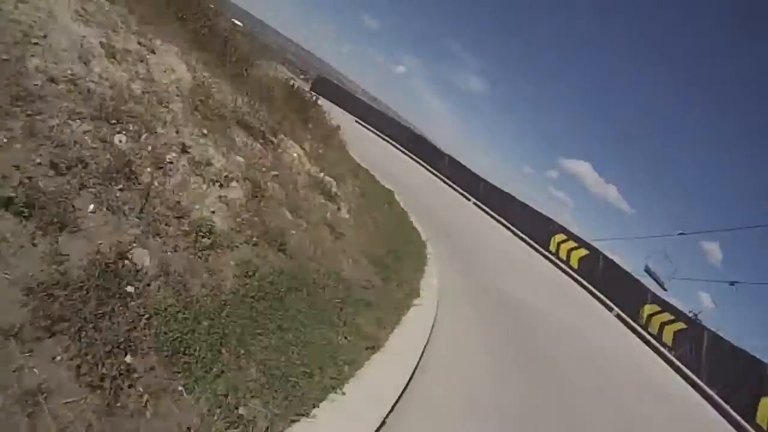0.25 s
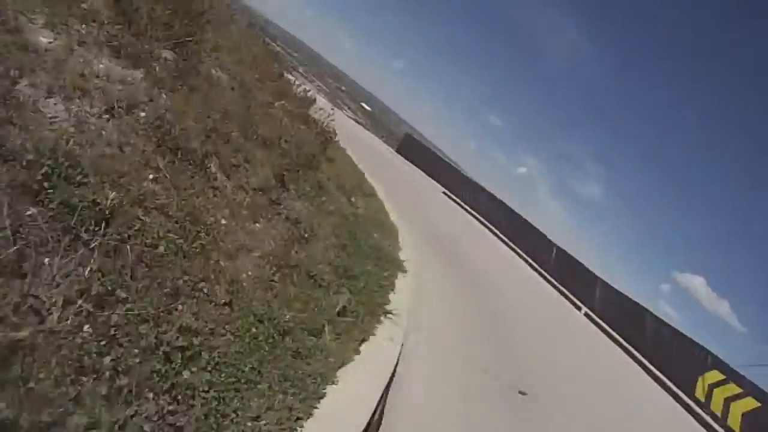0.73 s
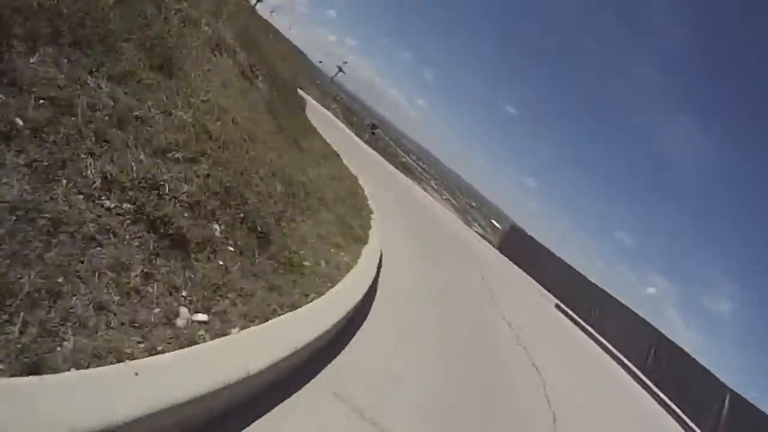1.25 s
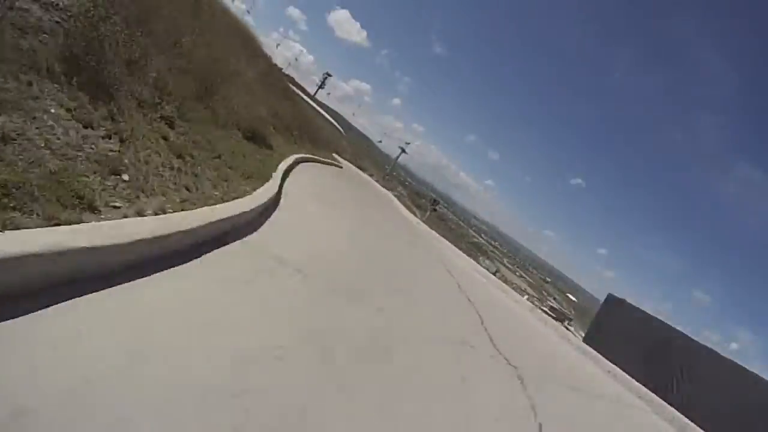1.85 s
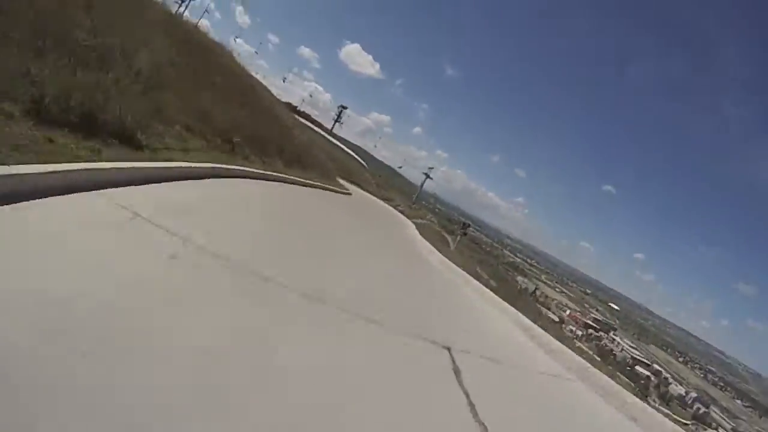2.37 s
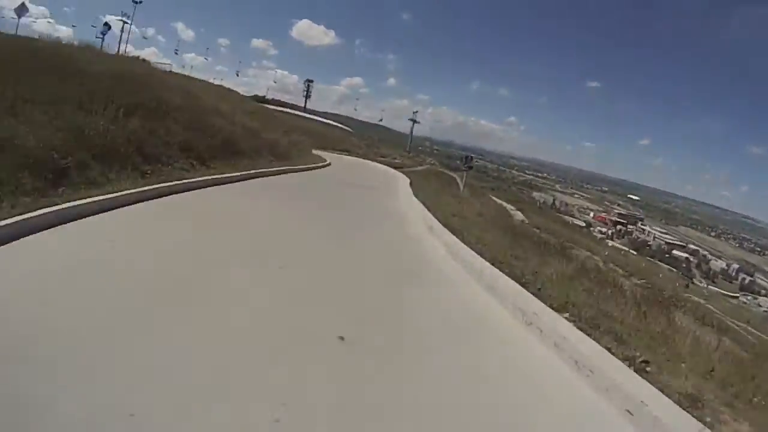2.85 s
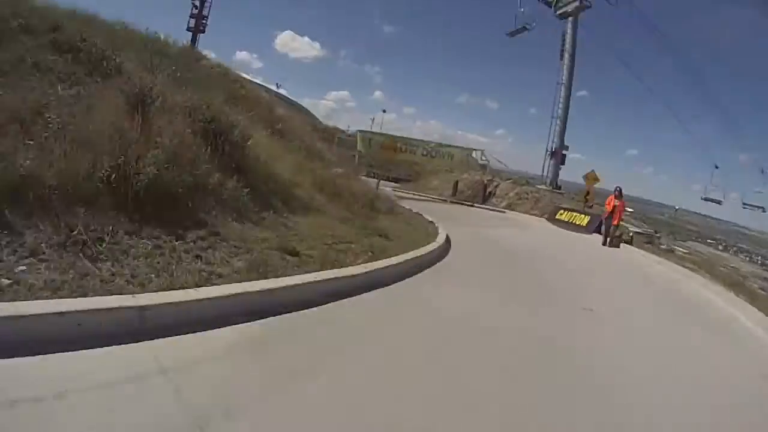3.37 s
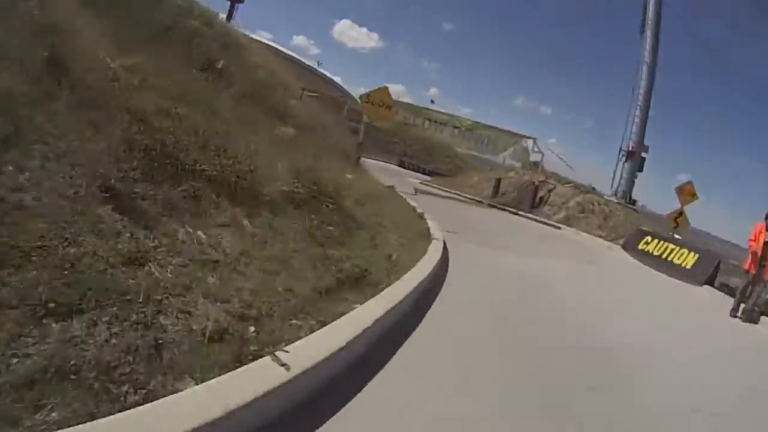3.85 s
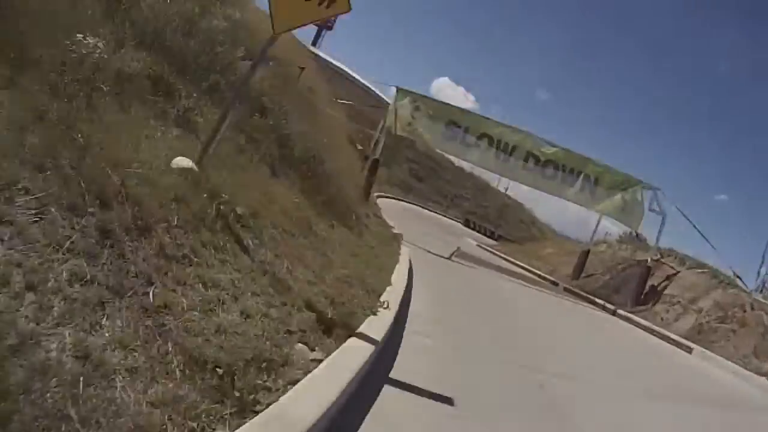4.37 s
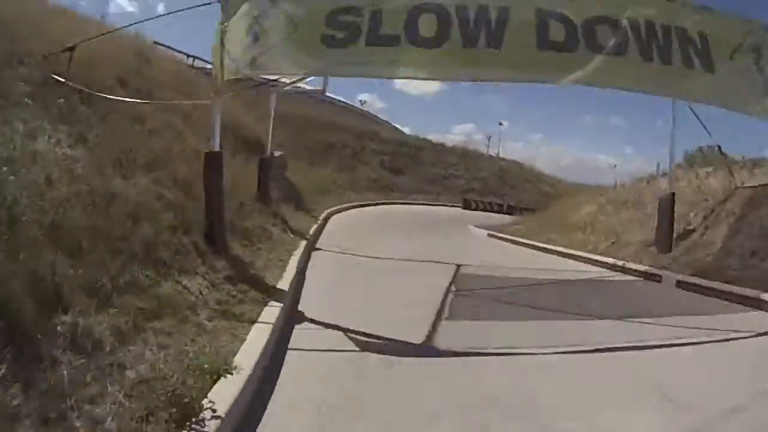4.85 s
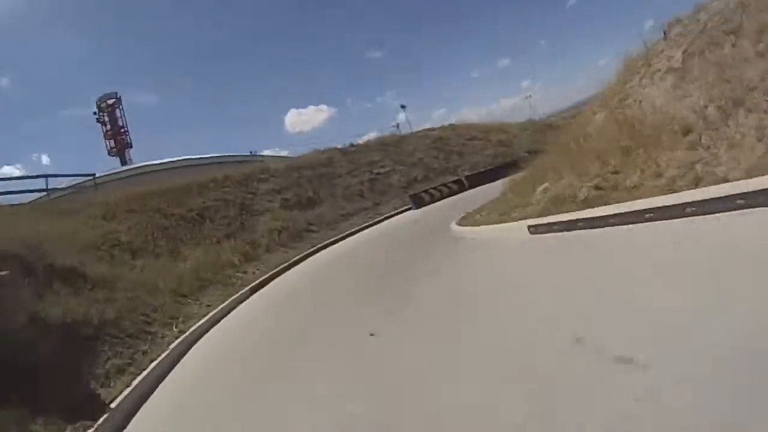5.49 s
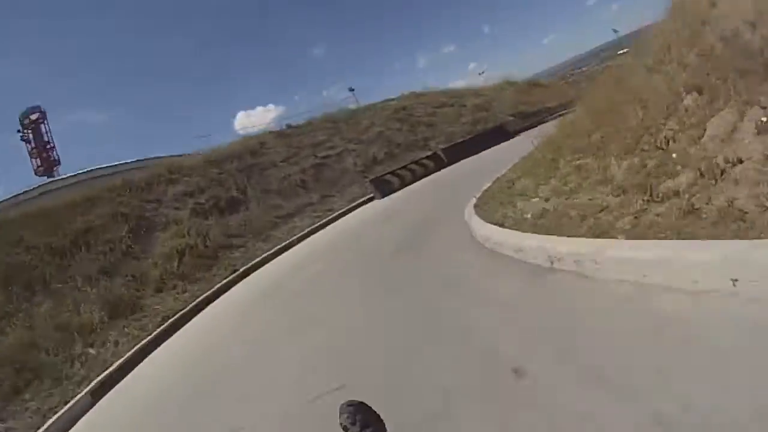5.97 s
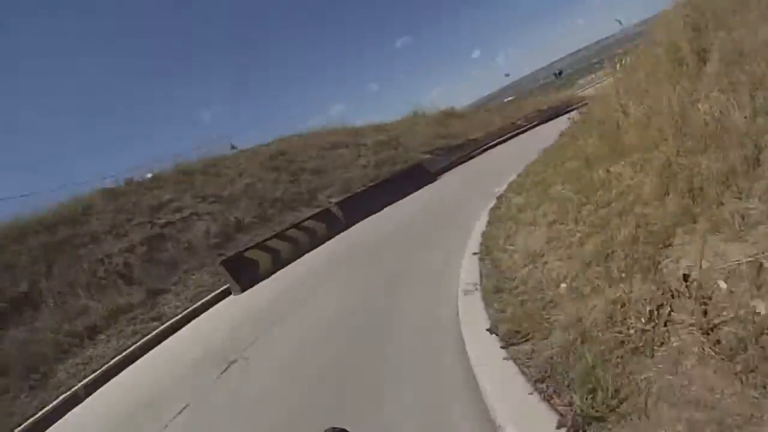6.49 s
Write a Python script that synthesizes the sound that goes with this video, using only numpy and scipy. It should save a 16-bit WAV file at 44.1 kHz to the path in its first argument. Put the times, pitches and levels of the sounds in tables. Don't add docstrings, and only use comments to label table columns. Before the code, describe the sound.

Heard from inside a closed case on board, hard wheels rumble and knock over rough concrete, with wind thumps and late hissing tyre slides.

```python
import sys
import numpy as np
from scipy import signal
from scipy.fft import rfft, irfft, next_fast_len
from scipy.io import wavfile
from scipy.ndimage import uniform_filter1d, minimum_filter1d, map_coordinates

SR = 44100
rng = np.random.default_rng(int(sys.argv[2]) if len(sys.argv) > 2 else 0)


def generate_wav(signal):
    frames = np.transpose(np.atleast_2d(signal))
    scaled = np.clip(frames, -1, 1) * 32767
    pcm = np.round(scaled).astype(np.int16)
    wavfile.write(sys.argv[1], SR, pcm)


def boost(x):
    u = np.asarray(x, float) / 20
    return 10 ** u


N = 296784

# start in seconds, peak in dB, pitch of the wheel's ring in Hz.
CRACKS = [(0.023, -6, 696), (0.043, -13.5, 610), (0.115, -9, 610), (0.209, -6, 688), (0.332, -7, 760),
          (0.428, -5, 640), (0.501, -6.5, 696), (0.547, -7, 633), (0.637, -2.5, 768), (0.832, -4, 702),
          (1.046, -10.5, 600), (1.162, -6.5, 608), (1.252, -3.5, 664), (1.315, -3.5, 612),
          (1.348, -6.5, 578), (1.506, -9, 665), (1.646, -8.5, 694), (1.736, -10.5, 740), (1.82, -8.5, 636),
          (1.85, -5.5, 690), (1.919, -8, 774), (2.032, -9, 718), (2.053, -11, 670), (2.25, -9.5, 656),
          (2.385, -12, 638), (2.562, -8.5, 791), (2.684, -9, 685), (2.949, -6.5, 567), (3.019, -7.5, 710),
          (3.138, -9, 493), (3.366, -5.5, 549), (3.463, -8.5, 700), (3.525, -4.5, 764), (3.668, -1, 580),
          (3.732, -6, 622), (3.922, -7.5, 648), (4.04, -11.5, 618), (4.21, -7.5, 595), (4.235, -9.5, 586),
          (4.265, -8, 460), (4.332, -7, 680), (4.473, -9, 515), (4.553, -3, 641), (4.724, -8, 583),
          (4.824, -14.5, 706), (4.969, -3.5, 638), (5.155, -11.5, 737), (5.34, -9.5, 697),
          (5.679, -8.5, 644), (5.81, -9.5, 634), (5.862, -6, 680), (5.93, -7.5, 733), (5.963, -12.5, 650),
          (6.199, -9.5, 738), (6.693, -4.5, 700)]
# start in seconds, peak in dB, pitch in Hz.
PART_KNOCKS = [(0.0212, -38, 5800), (0.0388, -36.5, 5790), (0.0726, -33, 5800), (0.1382, -30, 4400),
               (0.208, -36, 4690), (0.319, -37.5, 4380), (0.3402, -33.5, 5520), (0.377, -36, 4690),
               (0.529, -44, 4390), (0.6, -34, 5700), (0.7358, -41, 4160), (0.7552, -33.5, 6160),
               (0.793, -40, 5010), (0.95, -38, 4510), (1.016, -39, 4170), (1.066, -33, 5810),
               (1.1917, -41.5, 4420), (1.254, -38, 4930), (1.2985, -42, 4390), (1.3156, -37, 4300),
               (1.3473, -39.5, 4450), (1.4346, -35.5, 4400), (1.513, -35.5, 4640), (1.541, -40.5, 4600),
               (1.69, -41, 4340), (1.708, -43, 4600), (1.7636, -41, 4450), (1.8355, -39.5, 4440),
               (1.9005, -39.5, 4430), (1.9584, -41.5, 4740), (2.2277, -43.5, 4420), (2.5456, -43, 6340),
               (3.6343, -42.5, 4920), (3.6673, -36, 4660), (3.6903, -37, 4640), (3.8194, -48.5, 4400),
               (3.916, -37, 4450), (4.087, -39.5, 6050), (4.116, -43, 4340), (4.2771, -35, 5790),
               (4.3174, -42.5, 4160), (4.4014, -37.5, 5290), (4.4733, -34.5, 5850), (4.554, -33.5, 6670),
               (4.5999, -38.5, 4330), (4.6222, -37.5, 4620), (4.675, -43, 4300), (4.8938, -40.5, 4200)]
# start in seconds, peak in dB, pitch in Hz.
GRIT_TAPS = [(0.0366, -29.5, 1790), (0.0911, -28.5, 1810), (0.1386, -34, 1780), (0.185, -35.5, 1700),
             (0.2116, -28, 1980), (0.4806, -35.5, 1700), (0.531, -38, 2050), (0.611, -35, 1960),
             (0.737, -33, 1640), (0.7528, -36, 1960), (0.7705, -36.5, 1810), (0.8996, -34.5, 1780),
             (1.0666, -28, 1750), (1.0984, -34, 1700), (1.2986, -35, 1880), (1.6271, -33.5, 1980),
             (1.727, -37, 1770), (1.8384, -29.5, 1900), (1.8696, -30.5, 2170), (2.0857, -35.5, 2010),
             (2.226, -30, 1700), (2.3396, -38, 1880), (2.5458, -34, 2090), (2.5572, -25, 2150),
             (2.5905, -35.5, 1610), (2.6846, -30, 1800), (2.7543, -32.5, 2060), (2.8481, -31.5, 1620),
             (2.9432, -32.5, 2080), (3.0133, -35.5, 1610), (3.1136, -33.5, 1770), (3.147, -33.5, 2080),
             (3.3916, -32.5, 1820), (3.82, -37, 1940), (3.8352, -28.5, 2100), (3.913, -31, 1820),
             (3.9875, -30, 1730), (4.1527, -29, 1740), (4.2203, -27, 1800), (4.2774, -33.5, 1730),
             (4.342, -32.5, 1850), (4.471, -34.5, 1790), (4.5527, -25.5, 1990), (4.8248, -34.5, 1780),
             (4.9578, -31.5, 2020)]

# centre in Hz, width in Hz, level in dB.
DECK = [
    (181.2, 57.5, 4),
    (145.5, 30, -10.5),
    (213.5, 47, -1.5),
]
HULL = [
    (268.4, 93, 3.5),
    (457, 247, 4),
]
WHEEL = [
    (604, 183, 6),
    (769.7, 224, 3),
]
WHEEL_LOADED = [
    (714, 122, 5),
    (898, 267, -8.5),
    (1019, 210, -14.5),
]
TREAD = [
    (1130, 570, 4),
    (1519, 140, 0),
    (1694, 180, -2.5),
    (2186, 450, -6),
]
PARTS = [(2760, 330, 1.5), (3126, 430, -1.5), (3430, 500, -8), (4450, 1520, 2.5), (5270, 920, -2.5),
         (5790, 430, 0.5), (6410, 1400, -2.5), (7600, 600, -18), (7990, 1100, -8.5), (9700, 2300, -16.5),
         (11200, 2100, -16.5), (13200, 1900, -17.5)]
# centre in Hz, width in Hz, level in dB.
SQUEAL = [
    (1410, 250, 4.5),
    (2130, 300, 1.5),
    (3480, 170, -9.5),
]
# centre in Hz, width in Hz, level in dB.
SLOT = [
    (7500, 420, -4),
    (7970, 450, 4),
]

# frequency in Hz, level in dB per Hz.
SLIP_COLOUR = [(650, -22.5), (1100, 0.5), (1410, -12), (2060, -9.5), (2660, -12.5), (3580, -12.5),
               (3990, -18), (5200, -22), (8050, -42.5), (8950, -48.5), (14000, -55.5)]
# frequency in Hz, level in dB per Hz.
WIND_COLOUR = [(12, -30.5), (20, -9), (47, -3), (85, -7), (112, -6), (150, -33), (250, -120)]

# time in seconds, road drive in dB, deck freedom in dB,
# looseness of the parts in dB.
RIDE = [(0, -14.5, 2.5, -31), (.75, -14.5, -1.5, -35.5), (1.1, -14, -4, -35), (1.55, -13, -5, -39),
        (1.9, -15, -1, -37), (2.58, -16.5, -2.5, -39.5), (2.8, -14, 2.5, -39.5), (3.12, -15.5, -1, -38.5),
        (3.4, -12.5, -4.5, -41), (3.7, -14, -4.5, -39), (4.2, -15, -3.5, -37.5), (4.6, -13.5, -3.5, -37),
        (4.88, -19, 1, -34), (5.1, -11, -9.5, -42), (5.5, -11.5, -12.5, -40), (5.87, -13, -8, -38),
        (6.15, -14.5, -7.5, -42.5), (6.73, -13.5, -5.5, -38)]
# time in seconds, share from 0 to 1.
SIDE_LOAD = [
    (0, 0.11),
    (4.85, 0.07),
    (5.0, 0.23),
    (5.5, 0.8),
    (5.8, 0.41),
    (6.35, 0.4),
    (6.45, 0.7),
    (6.73, 0.57),
]
# time in seconds, centre in Hz.
RING_BALANCE = [(0.0, 700), (0.11, 611), (0.18, 678), (1.07, 630), (1.11, 674), (1.38, 550), (1.49, 710),
                (1.61, 597), (1.73, 687), (2.9, 648), (3.02, 710), (3.16, 610), (3.76, 634), (3.79, 658),
                (4.78, 660), (4.83, 716), (4.93, 640), (5.0, 730)]
# middle in seconds, change in dB, length in seconds.
WEIGHT_SHIFTS = [(.16, 9.5, 0.03), (.4, -4, 0.046), (.82, 0.5, 0.086), (.875, -5, 0.032),
                 (1.0, -3.5, 0.073), (1.075, -1.5, 0.071), (1.285, -4.5, 0.089), (1.45, 2.5, 0.03),
                 (1.69, -4.5, 0.033), (1.8, -2, 0.049), (1.92, 11, 0.022), (2.01, -3.5, 0.15),
                 (2.14, 2, 0.062), (2.25, 5.5, 0.026), (2.5, -3, 0.1), (2.57, 4, 0.039), (2.87, 3.5, 0.14),
                 (3.35, 0.5, 0.06), (3.5, -7.5, 0.017), (3.69, 5, 0.028), (3.83, -3.5, 0.094),
                 (3.92, 4.5, 0.056), (4.05, -1, 0.021), (4.6, 2, 0.12), (4.67, -7, 0.045),
                 (4.79, -3.5, .07), (5.32, -6.5, 0.059), (5.64, -6.5, 0.04), (6.02, -4.5, 0.11),
                 (6.37, -4.5, 0.026), (.68, 2.5, .08), (.95, 1, .06), (1.2, -0.5, 0.097),
                 (1.55, 0.5, 0.044), (2.72, 0.5, 0.074), (3.0, 0, .08), (3.2, -1, 0.072), (3.43, 1, 0.036),
                 (4.2, 2.5, 0.11), (4.88, -2, .08), (5.03, 4, 0.074), (5.18, 3.5, 0.079),
                 (5.42, 0.5, 0.055), (5.55, 0, 0.045), (5.73, 2.5, .06), (5.88, 1.5, 0.047),
                 (6.1, 1.5, 0.08), (6.25, -0.5, .08), (6.43, 1.5, .05), (6.52, 2, 0.045), (6.58, -3, .04),
                 (6.63, 2, .04)]
# middle in seconds, change in dB, length in seconds.
DECK_FLEXES = [(.09, -7.5, 0.027), (.36, 0, .06), (.47, 1, 0.038), (.62, 2, 0.051), (1.2, 3.5, .1),
               (1.58, -4, 0.11), (1.75, 2.5, 0.12), (1.93, -5, 0.19), (2.19, -8, 0.051), (3.07, 3, 0.081),
               (3.22, -2, 0.086), (3.33, 3.5, 0.05), (3.93, 7, 0.068), (4.45, 4.5, 0.069),
               (5.07, 6.5, 0.057), (5.62, -2.5, 0.11), (5.73, 1, .1), (6.33, 1.5, 0.16), (6.55, 0, 0.096)]
# middle in seconds, change in dB, length in seconds.
RATTLE_FITS = [(.16, 0, 0.1), (.35, 0, 0.094), (.8, 3.5, 0.065), (1.08, 5.5, 0.046), (1.32, 3, .05),
               (1.44, 2, 0.065), (2.06, 4.5, .05), (2.25, 3, 0.04), (2.57, 3.5, 0.044), (2.87, 2, 0.062),
               (3.92, 2.5, 0.11), (4.09, 2.5, 0.023), (4.17, 8, 0.024), (4.29, 4, 0.042),
               (4.36, 5.5, 0.055), (4.48, 3, 0.067), (4.56, 0, 0.053), (4.92, -2.5, .04), (5.45, 3, 0.14),
               (5.79, 0.5, 0.12)]

# start in seconds, length in seconds, slip level in dB.
SLIDES = [
    (4.972, .075, -38.5),
    (5.094, 0.19, -39.5),
    (5.358, 0.33, -36),
    (5.8, 0.024, -44),
    (5.874, 0.18, -40),
    (6.078, 0.12, -41),
    (6.375, 0.065, -38.5),
    (6.447, 0.099, -35.5),
    (6.578, 0.055, -35),
    (6.677, .06, -33.5),
]
# start in seconds, length in seconds, first pitch in Hz, level in dB.
SONGS = [
    (5.38, .3, 2200, -41),
    (5.92, .1, 2380, -46),
    (6.09, .11, 2310, -47),
    (6.445, .15, 2100, -39),
    (6.61, .12, 2080, -39.5),
]

# time in seconds, level in dB.
BREEZE = [(0, -27.5), (1.15, -35), (2.5, -30.5), (3.17, -38), (3.2, -25.5), (4.1, -30.5), (4.7, -31.5),
          (6.73, -32)]
# middle in seconds, rise over the breeze in dB, length in seconds.
GUSTS = [(.1, 1.5, 0.13), (1.27, 2, 0.07), (1.55, 4, 0.12), (1.77, 4, .08), (1.89, 8, .07),
         (2.27, 8.5, 0.1), (2.48, 5.5, 0.07), (3.22, 3, 0.09), (4.25, 5.5, 0.1), (4.37, 9, 0.06),
         (4.49, 10.5, 0.13), (4.93, 10, 0.19), (5.08, 17, 0.081), (5.23, 7, .08), (5.37, 7, 0.046),
         (5.72, 11.5, 0.053), (5.85, 10.5, 0.11), (6.1, 3.5, 0.067), (6.6, 6, 0.11)]
# time in seconds, size of the step in dB.
SCENE_CHANGE = (3.19116, -26)

HULL_DB, HULL_LOADED_DB, RING_DB, RING_LOADED_DB = -3.5, -7, -3, 2
LANDING_DB, LANDING_T60_S = -4, .09
BUZZ_DB, BUZZ_FOLLOWS = -25.5, 0.67
BUZZ_FITS = 0.71
DECK_FEELS, PARTS_FEEL, BUZZ_FEELS = 0.67, 0.83, 0.97
KNOCK_T60_S = 0.057
BITE_S, LET_GO_S = .02, .05
CREEP_DB, CREEP_FROM_S, CREEP_TOP = -42, 4.945, .5
BRIGHT_HZ, BRIGHT_LAG_S = 2600, .015
SAG_HZ, SETTLE_S, SONG_LINGERS_S = 130, .08, .15
STEADY_S = 6.05
WHISTLE_S, WHISTLE_DB, WHISTLE_RISE_S, WHISTLE_FADE_DB_PER_S = 2.77, -59, 0.071, 28


def wheels(shared):
    drive_db, free_db, _ = curves(RIDE)
    load = np.clip(curves(SIDE_LOAD)[0], 0, 1)
    shift_db = swells(WEIGHT_SHIFTS)
    boom_db = drive_db + free_db + DECK_FEELS * shift_db + swells(DECK_FLEXES) + 0.21 * wobble(18)
    hull_db = drive_db + HULL_DB + HULL_LOADED_DB * load + shift_db + 0.5 * wobble(19)
    ring_db = drive_db + RING_DB + RING_LOADED_DB * load + shift_db + 1.62 * wobble(14)

    blows, lift, landings = np.zeros(N), np.zeros(N), np.zeros(N + SR)
    gap = np.hanning(SR // 60)
    t = np.arange(SR // 10) / SR
    for s, db, hz in CRACKS:
        at = round(s * SR)
        blows[at] = boost(db + 25)
        fade = boost(db + LANDING_DB - 60 * t / LANDING_T60_S) * (1 - np.exp(-t / .001))
        landings[at:at + len(t)] += fade * np.sin(2 * np.pi * hz * t)
        lift[at - len(gap) + 260:at + 260] += gap
    touch = 1 - .6 * np.clip(lift, 0, 1)

    grain = road(shared, depth=0.27, own_db=0.6)
    low_ring, high_ring = (even(filtered(grain, body([mode], order=2)), size=1200) for mode in WHEEL)
    high = np.clip(0.5 + 0.58 * (curves(RING_BALANCE)[0] - 680) / 160, 0.1, 0.9)
    free = np.sqrt(1 - high) * low_ring - boost(-1.0) * np.sqrt(high) * high_ring
    bent = even(filtered(road(shared, depth=0.16, own_db=3.5), body(WHEEL_LOADED, order=2)), size=1200)
    boom = even(filtered(road(shared, depth=0.21, own_db=-2.9), body(DECK, order=2)), size=2400)
    panels = even(filtered(road(shared, depth=0.22, own_db=-0.1), body(HULL, order=2)), size=1800)

    out = boost(ring_db - 2.1) * touch * (np.sqrt(1 - load) * free + np.sqrt(load) * bent)
    out += boost(boom_db - 3.0) * boom
    out += boost(hull_db - 0.92) * touch * panels
    soft = lambda f: 1 / (1 + 1j * f / 1000) ** 4
    out += filtered(blows, lambda f: soft(f) * (body(WHEEL)(f) + 0.85 * body(HULL)(f)))
    return filtered(out + landings[:N], muffle)


def rattle(shared):
    drive_db, _, loose_db = curves(RIDE)
    shift_db, fit_db = swells(WEIGHT_SHIFTS), swells(RATTLE_FITS)
    rattle_db = drive_db + loose_db + PARTS_FEEL * shift_db + fit_db + 0.86 * wobble(22)
    buzz_db = drive_db + BUZZ_DB + BUZZ_FOLLOWS * (loose_db - loose_db.mean())
    buzz_db = buzz_db + BUZZ_FEELS * shift_db + BUZZ_FITS * fit_db + 1.3 * wobble(22)

    together = shared + struck(PART_KNOCKS, gain_db=36, t60=0.045)
    chatter = np.zeros(N)
    for part in PARTS:
        alone = 0.5 * bumps(40, spread_db=0.6, t60=0.042)
        shaken = road(together + alone, depth=1.0, own_db=0.0)
        octaves_up = max(np.log2(part[0] / 6500), 0)
        bright = boost(.5 * (rattle_db + 48.5) * octaves_up)
        chatter += bright * filtered(shaken, body([part], order=3))

    gritty = shared + struck(GRIT_TAPS, gain_db=39, t60=0.04) + 0.33 * bumps(64, spread_db=8.0, t60=0.046)
    gritty_road = road(gritty, depth=1.0, own_db=0.0)
    buzz = filtered(gritty_road, lambda f: muffle(f) * body(TREAD, order=2)(f))

    out = boost(rattle_db - 2.0) * unit(chatter) + boost(buzz_db - 2.5) * unit(buzz)
    out += contacts(PART_KNOCKS, PARTS, crack_db=1.0, crack_t60=0.0083, ring_db=-7.5, ring_t60=KNOCK_T60_S)
    tapped = TREAD[1:] + PARTS[:2]
    return out + contacts(GRIT_TAPS, tapped, crack_db=0.5, crack_t60=0.015, ring_db=-3.5, ring_t60=0.018)


def scrub():
    creep = boost(CREEP_DB) * held(CREEP_FROM_S, N / SR, BITE_S, LET_GO_S)
    slip = sum(boost(db) * held(s, length, BITE_S, LET_GO_S) for s, length, db in SLIDES)
    late = np.minimum(slip, np.roll(slip, round(BRIGHT_LAG_S * SR)) * (np.arange(N) > SR))

    grip = road(bumps(500, spread_db=2.4, t60=.02), depth=.5, own_db=.4)
    colour = lambda f: boost(along(SLIP_COLOUR, f)) + boost(-17.0) * np.abs(body(SQUEAL, order=2)(f))
    hiss = unit(filtered(grip, colour))
    top = filtered(hiss, lambda f: 1 / (1 + (BRIGHT_HZ / (f + 1)) ** 8))
    scrape = (slip + creep) * (hiss - top) + (late + CREEP_TOP * creep) * top

    song = sum(boost(db) * held(s, length, BITE_S, SONG_LINGERS_S) for s, length, _, db in SONGS)
    pitches = []
    for s, length, first_hz, _ in SONGS:
        sunk_hz = first_hz - SAG_HZ
        pitches += [(s, first_hz), (s + SETTLE_S, sunk_hz), (s + length, sunk_hz)]
    hz = curves(pitches)[0]
    loose = 1 + 2 * (np.arange(N) < STEADY_S * SR)
    tones = sliding(hz, 65 * loose)
    tones += .7 * sliding(.7 * hz + 50 * wobble(8), 60 * loose)
    tones += .3 * sliding(.86 * hz, 45 * loose)
    return boost(2.0 + 1.2 * wobble(15)) * scrape + song * tones


def wind():
    buffet_db = curves(BREEZE)[0] + swells(GUSTS)
    rush = filtered(rng.standard_normal(N), lambda f: boost(along(WIND_COLOUR, f)))
    since = np.arange(N) / SR - WHISTLE_S
    whistle = boost(WHISTLE_DB - WHISTLE_FADE_DB_PER_S * np.abs(since)) * np.clip(since / WHISTLE_RISE_S, 0, 1)
    whistle *= since < SCENE_CHANGE[0] - WHISTLE_S
    thin = filtered(boost(2.5 * wobble(60)) * rng.standard_normal(N), body(SLOT, order=2))
    return boost(buffet_db) * unit(boost(1.4 * wobble(24)) * rush) + whistle * unit(thin)


def road(shared, depth, own_db):
    return unit((1 + depth * shared) * boost(own_db * wobble(30)) * rng.standard_normal(N))


def bumps(per_s, spread_db, t60):
    chance, size = rng.random(N), rng.exponential(1, N)
    knocks, hit = np.zeros(N), chance < per_s / SR
    knocks[hit] = boost(spread_db * size[hit])
    return unit(signal.lfilter([1], [1, -boost(-60 / (t60 * SR))], knocks))


def struck(rows, gain_db, t60):
    knocks = np.zeros(N)
    for s, db, *_ in rows:
        knocks[round(s * SR)] = boost(db + gain_db)
    return signal.lfilter([1], [1, -boost(-60 / (t60 * SR))], knocks)


def contacts(rows, modes, crack_db, crack_t60, ring_db, ring_t60):
    t, knocks, rings = np.arange(SR // 20) / SR, np.zeros(N + SR), np.zeros(N + SR)
    for s, db, hz in rows:
        span = slice(round(s * SR), round(s * SR) + len(t))
        knocks[span] += boost(db + crack_db - 60 * t / crack_t60) * rng.standard_normal(len(t))
        fade = boost(db + ring_db - 60 * t / ring_t60) * (1 - np.exp(-t / 0.00079))
        rings[span] += fade * np.sin(2 * np.pi * hz * t)
    return rings[:N] + filtered(knocks[:N], body(modes, order=3))


def sliding(hz, wander_hz):
    phase = 2 * np.pi * np.cumsum(hz + .4 * wander_hz * wobble(40)) / SR
    steady_part = (.6 + .8 * wobble(3 * wander_hz)) * np.sin(phase)
    return unit(steady_part + .8 * wobble(3 * wander_hz) * np.cos(phase))


def body(modes, order=1):
    def response(f):
        total = 0
        for k, (centre, width, db) in enumerate(modes):
            peak = 1j * f * width / (centre * centre - f * f + 1j * f * width)
            total = total + (-1) ** k * boost(db) * peak ** order
        return total
    return response


def muffle(f):
    return 1 / np.sqrt(1 + (f / 2450) ** 12)


def even(x, size):
    power = np.abs(uniform_filter1d(uniform_filter1d(x ** 2, size=size), size=size)) + 1e-12
    return unit(x / power ** .35)


def held(s, length, rise, fall):
    t = np.arange(N) / SR - s
    return np.clip(t / rise, 0, 1) ** 2 * np.exp(-3 * np.clip(t - length, 0, None) / fall)


def swells(rows):
    t = np.arange(0, N / SR, .002)
    total = sum(db * np.exp(-(2 * (t - s) / length) ** 2) for s, db, length in rows)
    return np.interp(np.arange(N) / SR, t, total)


def curves(rows):
    s, *cols = np.transpose(rows)
    return [np.interp(np.arange(N) / SR, s, c) for c in cols]


def wobble(rate):
    return map_coordinates(rng.standard_normal(N // 50), [np.arange(N) * rate / SR], mode="wrap")


def along(points, hz):
    f, v = np.transpose(points)
    return np.interp(np.log(hz + 1), np.log(f + 1), v)


def filtered(x, response):
    m = next_fast_len(N + SR // 2)
    return irfft(rfft(x, m) * response(np.fft.rfftfreq(m, 1 / SR)), m)[:N]


def unit(x):
    return x / np.sqrt(np.mean(x ** 2) + 1e-20)


def scene():
    grain = 0.46 * bumps(120, spread_db=3.0, t60=0.012)
    shared = grain + struck(CRACKS, gain_db=8.5, t60=0.093)
    return (wheels(shared) + rattle(grain) + scrub() + wind())[None]


def low_pass(x):
    return signal.sosfilt(signal.butter(12, 15900, fs=SR, output="sos"), x)


def record(dry):
    x = filtered(dry[0], lambda f: 1 / (1 + (f / 14300) ** 40))
    need = np.minimum(1, .86 / (np.abs(x) + 1e-9))
    x = x * uniform_filter1d(minimum_filter1d(need, size=1801), size=900)
    s, step_db = SCENE_CHANGE
    after = np.arange(N) / SR - s
    step = boost(step_db) * (after >= 0) * np.exp(-np.abs(after) / 0.00048)
    return low_pass((x + step)[None])


dry = scene()
out = record(dry)
generate_wav(out)
```